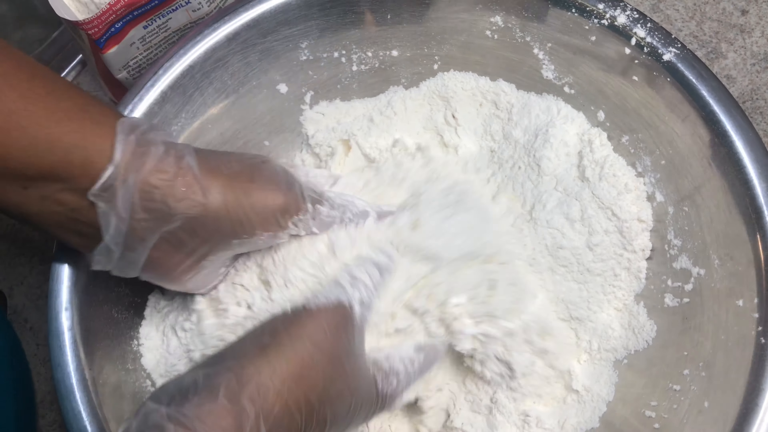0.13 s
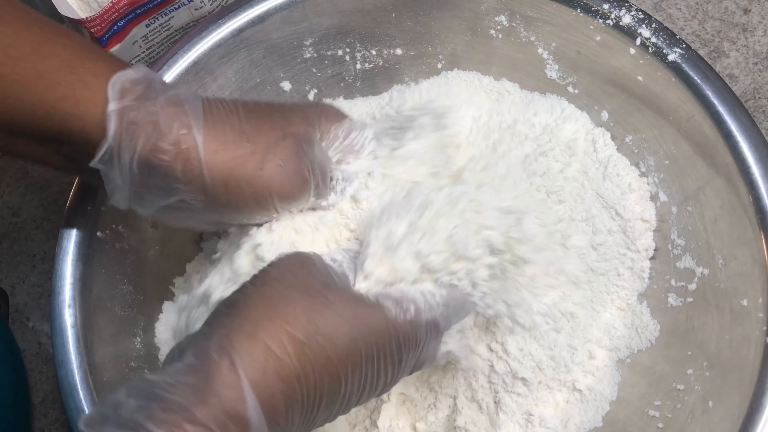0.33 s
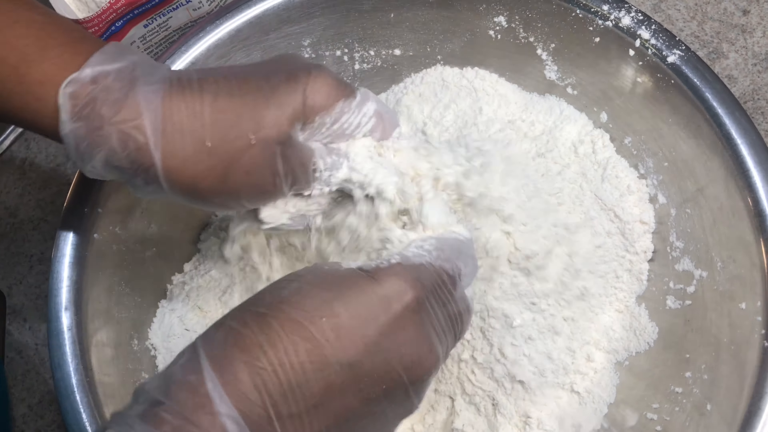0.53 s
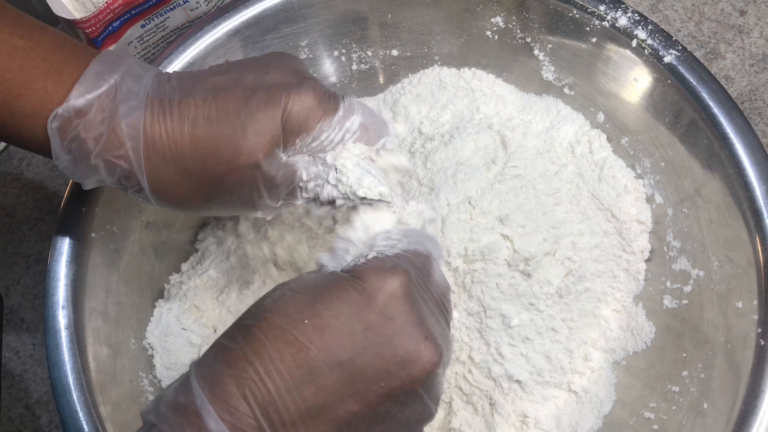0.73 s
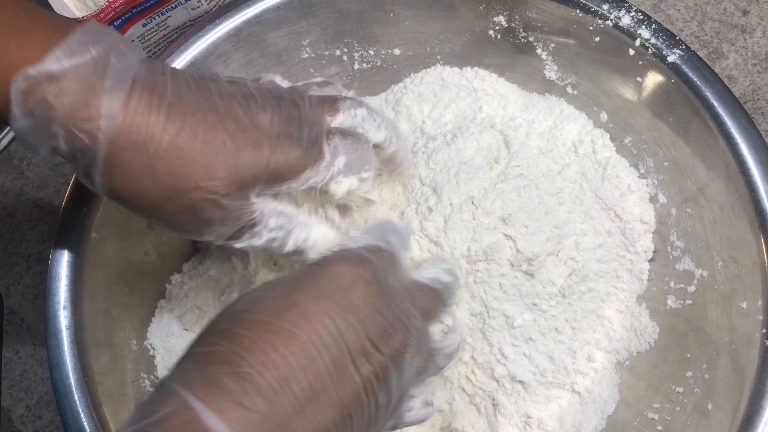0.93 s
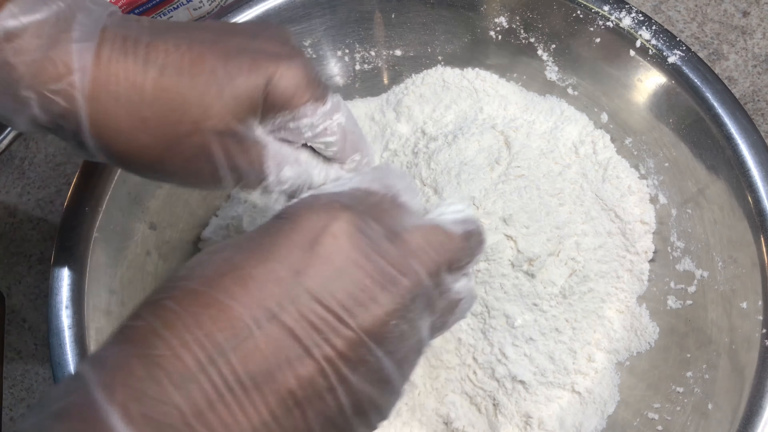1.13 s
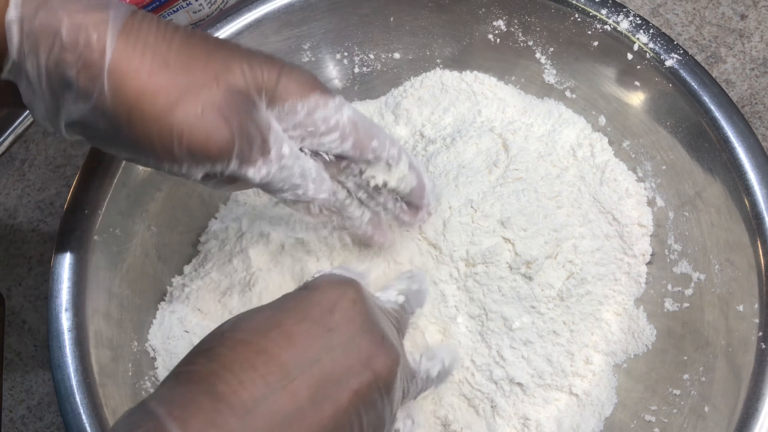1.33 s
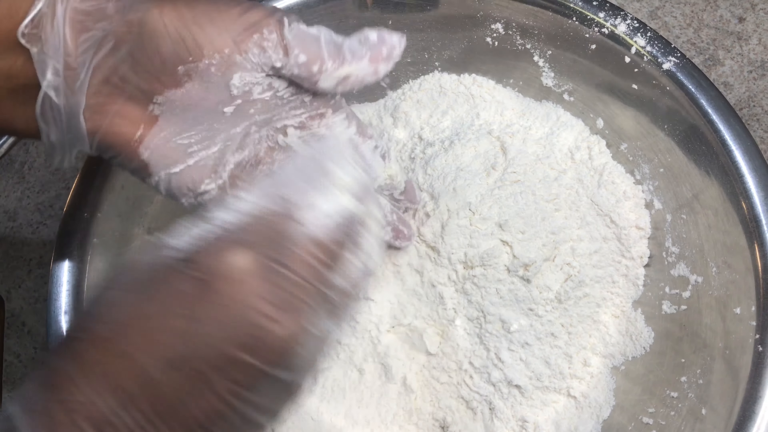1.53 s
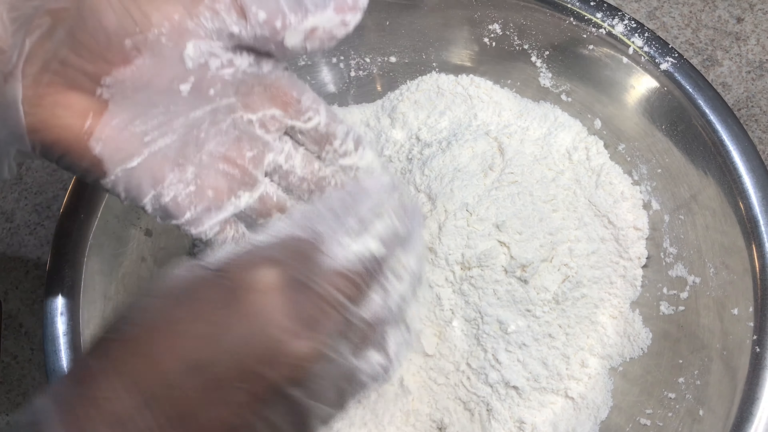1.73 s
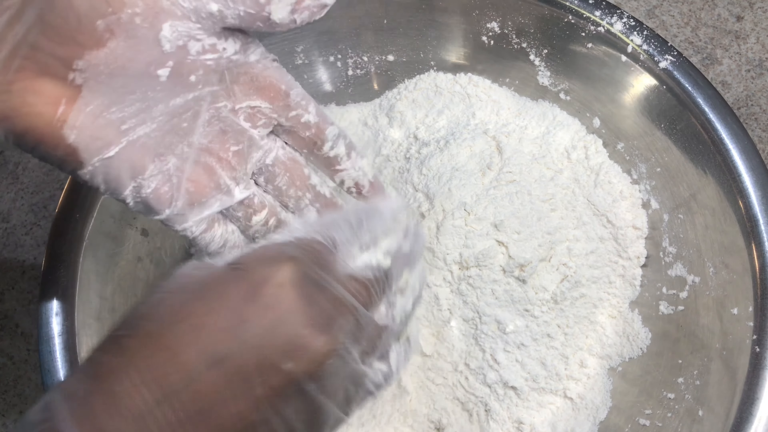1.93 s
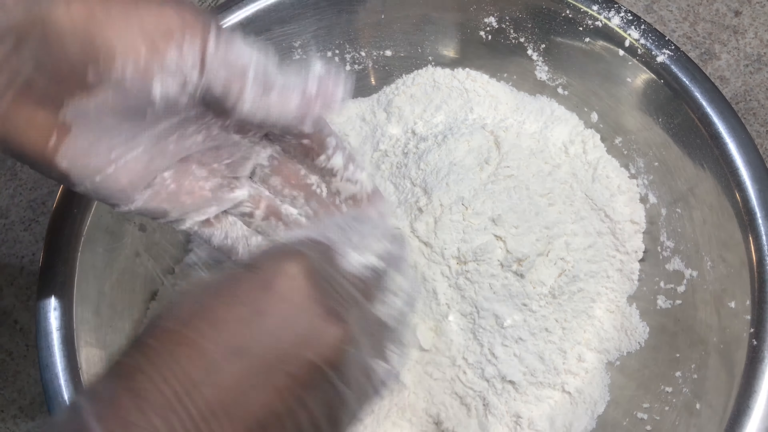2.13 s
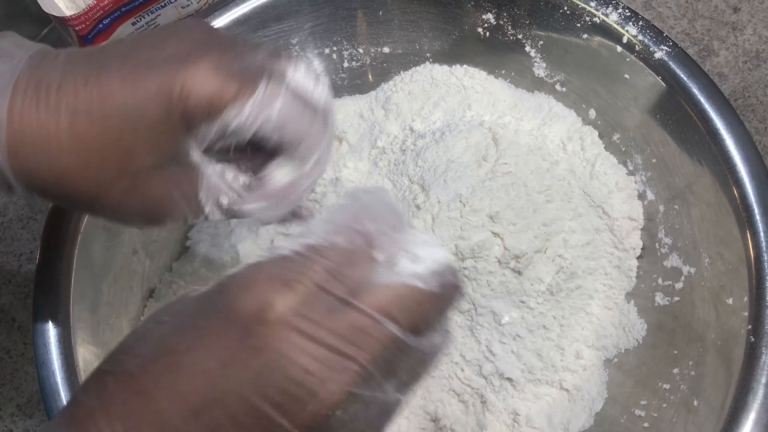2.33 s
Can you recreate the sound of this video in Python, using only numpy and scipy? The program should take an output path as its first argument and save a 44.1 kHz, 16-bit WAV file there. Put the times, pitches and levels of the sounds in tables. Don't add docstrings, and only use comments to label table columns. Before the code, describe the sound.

Gloved hands rub fat into flour in a steel bowl, soft crinkly rustles over low rumble

```python
import sys
import numpy as np
from scipy import signal
from scipy.fft import rfft, irfft
from scipy.io import wavfile

SR = 44100
rng = np.random.default_rng(int(sys.argv[2]) if len(sys.argv) > 2 else 0)


def to_wav(sig):
    pcm = np.clip(np.atleast_2d(sig), -1, 1) * 32767
    pcm = np.round(pcm).astype(np.int16)
    wavfile.write(sys.argv[1], SR, pcm.T)


def decibels_to_gain(level_db):
    exponent = np.asarray(level_db, float) / 20
    return 10 ** exponent


N = 109191

# start in seconds, length in seconds, level at start in dB, level at end in dB.
STROKES = [(0.0, 0.28, -54, -71.5), (0.589, 0.13, -60.5, -58), (0.7, 0.047, -58, -51),
           (.76, 0.098, -57.5, -52), (0.868, .04, -52.5, -52), (0.925, 0.12, -62, -59),
           (1.063, .07, -58.5, -48), (1.14, 0.02, -48, -50.5), (1.166, 0.042, -53, -45.5),
           (1.21, 0.036, -46.5, -45.5), (1.244, 0.037, -46, -39.5), (1.323, 0.33, -59.5, -58),
           (1.557, 0.028, -48, -37), (1.589, 0.04, -48, -37.5), (1.64, 0.059, -61, -64),
           (1.756, 0.022, -60, -64), (1.800, 0.078, -35.5, -44.5), (2.011, 0.025, -43.5, -39),
           (2.044, 0.084, -40, -43.5), (2.138, 0.071, -55.5, -45), (2.203, 0.039, -54, -43),
           (2.259, 0.05, -57, -46.5), (2.305, 0.046, -43, -45.5), (2.369, 0.018, -62, -56.5),
           (2.389, 0.035, -52, -40.5), (2.427, 0.027, -43, -46)]
# frequency in Hz, level in dB per Hz.
FILM_COLOUR = [(500, -22), (1200, -8.5), (1900, -15.5), (2400, -3.5), (4800, -3.5), (6500, -5.5),
               (9500, -4), (15600, -10.5)]
# frequency in Hz, width in Hz, level in dB.
BOWL_MODES = [(2398, 21, -21), (2423, 19, -15.5), (2707, 42, -23), (2912, 18, -22), (3870, 22.4, -20.5),
              (4690, 50, -20), (4970, 28, -22), (9220, 22, -16)]
# frequency in Hz, level in dB per Hz.
AIR_COLOUR = [(25, 1), (50, 1), (90, -9.5), (200, -13), (380, -16), (1100, -27.5), (2500, -35.5),
              (15600, -46.5)]
# frequency in Hz, rms level in dB.
HUM_LINES = [(59.8, -60), (119.8, -47), (179.5, -64.5)]
# frequency in Hz, width in Hz, level in dB.
CASING_MODES = [(324, 23.6, -60.5), (405, 6.7, -66.5), (535, 41, -65), (584.5, 8.1, -80.5)]
# time in seconds, pressure in full scale.
SWAY_TURNS = [(-.01, .03), (.03, .11), (.086, .07), (.121, .11), (.19, .03), (.313, -.123), (.385, 0),
              (.44, .08), (.516, -.13), (.645, .055), (.685, .11), (.722, -.09), (.75, -.05), (.788, -.11),
              (.96, .03), (1.01, .03), (1.098, -.03), (1.19, .068), (1.257, .03), (1.295, .075),
              (1.403, -.187), (1.518, .096), (1.616, -.066), (1.722, .119), (1.835, -.295), (1.935, .39),
              (2.062, -.417), (2.175, .405), (2.306, -.4), (2.432, .285)]
# time in seconds, pressure in full scale.
SWAY_END = (2.476, .12)
# start in seconds, size in full scale, ring in Hz.
KNOCKS = [
    (.160, -.05, 50),
    (.398, .36, 41),
    (.655, .13, 38),
]
# start in seconds, length in seconds, level in dB, pitch in Hz.
HOLLOWS = [(0.206, 0.23, -70, 3780), (0.69, 0.18, -64.5, 2750), (.76, 0.093, -63.5, 3860),
           (0.881, .012, -59, 4030), (0.896, 0.022, -54.5, 2820), (0.922, 0.0033, -51, 5960),
           (0.933, .01, -60, 2900), (1.097, 0.035, -61, 4000), (1.136, 0.024, -50, 4070),
           (1.25, 0.033, -51, 3820), (1.315, 0.17, -64.5, 11300), (1.316, 0.17, -67.5, 4350),
           (1.553, .008, -48, 3200), (1.568, 0.016, -48, 2600), (1.596, 0.035, -52.5, 2780),
           (1.604, 0.031, -47.5, 4860), (1.801, 0.0092, -50.5, 2210), (1.803, 0.012, -50.5, 3700),
           (2.016, 0.011, -40.5, 2800), (2.042, 0.088, -60.5, 2670), (2.2, 0.023, -59.5, 1220),
           (2.234, 0.047, -60, 1220), (2.28, 0.06, -54.5, 1110), (2.303, 0.043, -49, 1700),
           (2.31, 0.025, -48.5, 2590), (2.407, 0.022, -58, 1350), (2.414, 0.028, -49.5, 2180)]
# start in seconds, level in dB, pitch in Hz.
PATS = [(0.799, -53, 285), (1.287, -50.5, 885), (1.39, -47, 284), (1.582, -43.5, 596), (1.626, -38.5, 1000),
        (1.807, -45, 850), (1.81, -53, 268), (1.881, -52, 200), (2.021, -41, 810), (2.024, -40.5, 340),
        (2.13, -50, 277), (2.21, -44, 1230), (2.288, -43.5, 414), (2.325, -52, 1280)]
DROPOUTS_S = [.66259, 1.98619]

GRAINS_PER_S, GRAIN_SPREAD_DB = 9000, 1.5
FILM_DB, FILM_PATCHY_DB, FILM_PATCHES_PER_S = -4.5, 1.2, 20
STROKE_ATTACK_S, STROKE_RELEASE_S = 0.0072, 0.016
ROOM_T60_S, ROOM_DB = 0.083, -18
AIR_DB, AIR_PATCHY_DB = -46.5, 1.5
HUM_WOBBLE_DB = 1.0
KNOCK_RISE_S, KNOCK_PUSH_S, KNOCK_RING_S, KNOCK_RING = 0.004, 0.047, 0.0214, 0.47
HOLLOW_WIDTH, HOLLOW_SMEAR_PER_S = 0.24, 20
HOLLOW_ATTACK_S, HOLLOW_RELEASE_S = 0.0038, 0.0056
PAT_ATTACK_S, PAT_CYCLES = 0.002, 4.3
LOST_SAMPLES = 3
CUTOFF_HZ = 15800


def rms_one(x):
    return x / np.sqrt(np.mean(x ** 2) + 1e-20)


def drift(rate):
    r = np.exp(-80 * np.pi * rate / SR)
    slow = signal.lfilter([1], [1, -2 * r, r * r], rng.standard_normal(N // 40 + 2002))[2000:]
    return np.interp(np.arange(N) / 40, np.arange(len(slow)), rms_one(slow - slow.mean()))


def colour(x, spectrum):
    hz, db = np.transpose(spectrum)
    grid = np.maximum(np.arange(len(x) // 2 + 1) * SR / len(x), 1)
    gain = decibels_to_gain(np.interp(np.log(grid), np.log(hz), db)) * (grid > 15)
    return irfft(rfft(x) * gain, len(x))


def resonate(x, hz, width_hz):
    r = np.exp(-np.pi * width_hz / SR)
    poles = [1, -2 * r * np.cos(2 * np.pi * hz / SR), r * r]
    return signal.lfilter([(1 - r * r) / 2, 0, (r * r - 1) / 2], poles, x)


def envelope(start, length, release, attack):
    t = np.arange(N) / SR - start
    return np.clip(t / attack, 0, 1) * np.exp(-np.clip(t - length, 0, 40 * release) / release)


def grains():
    size_db = GRAIN_SPREAD_DB * np.minimum(rng.exponential(1, N), 5)
    sizes = decibels_to_gain(size_db) * rng.choice([-1, 1], N)
    return rms_one(sizes * (rng.random(N) < GRAINS_PER_S / SR))


def film_rustle():
    spectrum = rfft(colour(grains(), FILM_COLOUR))
    hz = np.arange(1, N // 2 + 2) * SR / N
    band = np.clip(np.log2(hz / 500) * 1.5, 0, 7)
    out = np.zeros(N)
    for k in range(8):
        crossfade = np.cos(np.pi / 2 * np.clip(band - k, -1, 1)) ** 2
        fold = irfft(spectrum * crossfade, N)
        out += fold * decibels_to_gain(FILM_PATCHY_DB * drift(FILM_PATCHES_PER_S))
    return rms_one(out)


def strokes():
    t = np.arange(N) / SR
    loudness = np.zeros(N)
    for start, length, from_db, to_db in STROKES:
        glide_db = np.interp(t, [start, start + length], [from_db, to_db])
        loudness += decibels_to_gain(FILM_DB + glide_db) * envelope(start, length, STROKE_RELEASE_S, STROKE_ATTACK_S)
    return film_rustle() * loudness


def bowl(rub):
    return sum(decibels_to_gain(db + 14.5) * resonate(rub, hz, width_hz) for hz, width_hz, db in BOWL_MODES)


def kitchen(x):
    t = np.arange(SR // 2) / SR
    tail = rng.standard_normal(len(t)) * decibels_to_gain(-60 * t / ROOM_T60_S) * (t > .004)
    return decibels_to_gain(ROOM_DB) * signal.fftconvolve(x, tail / np.linalg.norm(tail))[:N]


def air():
    noise = decibels_to_gain(AIR_DB) * rms_one(colour(rng.standard_normal(N), AIR_COLOUR))
    low = signal.sosfiltfilt(signal.butter(2, 300, fs=SR, output="sos"), noise)
    return low * decibels_to_gain(AIR_PATCHY_DB * drift(8)) + (noise - low) * decibels_to_gain(.5 * drift(20))


def fridge():
    t = np.arange(N) / SR
    shake = rng.standard_normal(N)
    out = np.zeros(N)
    for hz, db in HUM_LINES:
        level = np.sqrt(2) * decibels_to_gain(db + HUM_WOBBLE_DB * drift(6))
        out += level * np.sin(2 * np.pi * hz * t + .35 * drift(4))
    for hz, width_hz, db in CASING_MODES:
        out += decibels_to_gain(db + 1.7 * drift(8.9)) * rms_one(resonate(shake, hz, width_hz))
    return out


def sway():
    s, p = np.transpose(SWAY_TURNS + [SWAY_END])
    place = np.interp(np.arange(N) / SR, s, np.arange(len(s)))
    k = np.minimum(place.astype(int), len(s) - 2)
    return p[k] + (p[k + 1] - p[k]) * (1 - np.cos(np.pi * (place - k))) / 2


def knocks():
    out = np.zeros(N)
    for start, size, hz in KNOCKS:
        u = np.maximum(np.arange(N) / SR - start, 0)
        rise = 1 - np.exp(-(u / KNOCK_RISE_S) ** 2)
        push = .5 * np.exp(-u / KNOCK_PUSH_S)
        ring = KNOCK_RING * np.exp(-u / KNOCK_RING_S) * np.sin(2 * np.pi * hz * u)
        out += size * rise * (push + ring)
    return out


def hollows():
    slips = grains()
    out = np.zeros(N)
    for start, length, db, hz in HOLLOWS:
        width_hz = HOLLOW_WIDTH * hz * (1 + HOLLOW_SMEAR_PER_S * min(length, .04))
        hollow = rms_one(resonate(resonate(slips, hz, width_hz), hz, width_hz))
        out += decibels_to_gain(db) * hollow * envelope(start, length, HOLLOW_RELEASE_S, HOLLOW_ATTACK_S)
    return out


def pats():
    puff = rng.standard_normal(N)
    out = np.zeros(N)
    for start, db, hz in PATS:
        thud = rms_one(resonate(puff, hz, 0.66 * hz))
        out += decibels_to_gain(db) * thud * envelope(start, 0, PAT_CYCLES / hz, PAT_ATTACK_S)
    return out


def scene():
    rub = strokes() + hollows()
    hands = rub + bowl(rub) + pats()
    return (hands + kitchen(hands) + air() + fridge() + sway() + knocks())[None]


def roll_off(x):
    return signal.sosfilt(signal.butter(12, 15750, fs=SR, output="sos"), x)


def record(dry):
    kept = np.ones(N)
    for s in DROPOUTS_S:
        kept[int(s * SR):int(s * SR) + LOST_SAMPLES] = 0
    top_cut = signal.ellip(10, .1, 30, CUTOFF_HZ, fs=SR, output="sos")
    mix = signal.sosfiltfilt(top_cut, dry * kept)
    return roll_off(mix)


dry = scene()
out = record(dry)
to_wav(out)
```